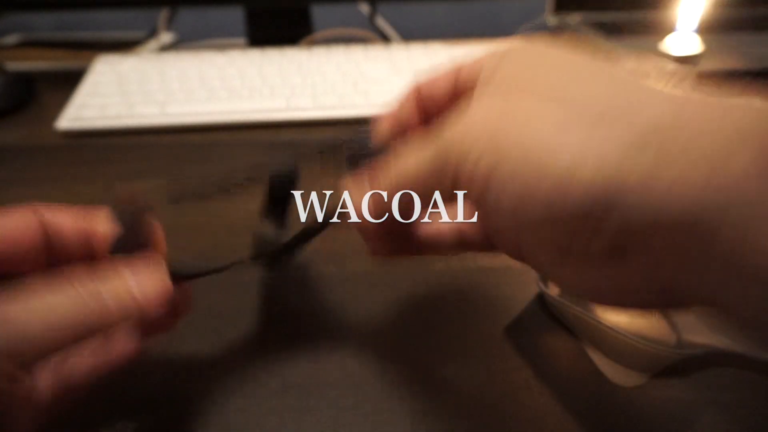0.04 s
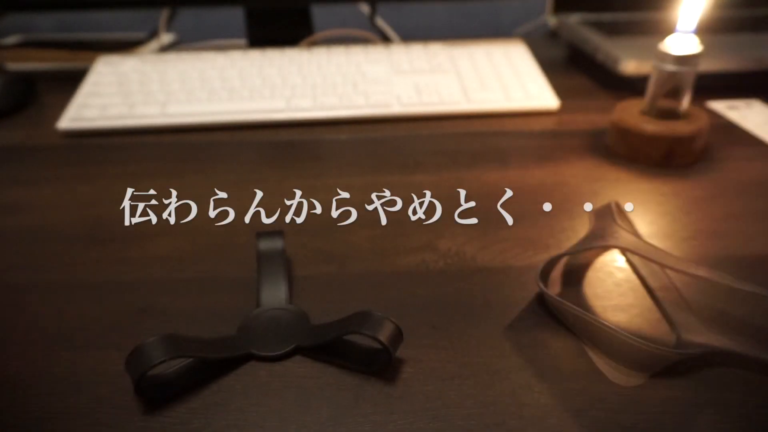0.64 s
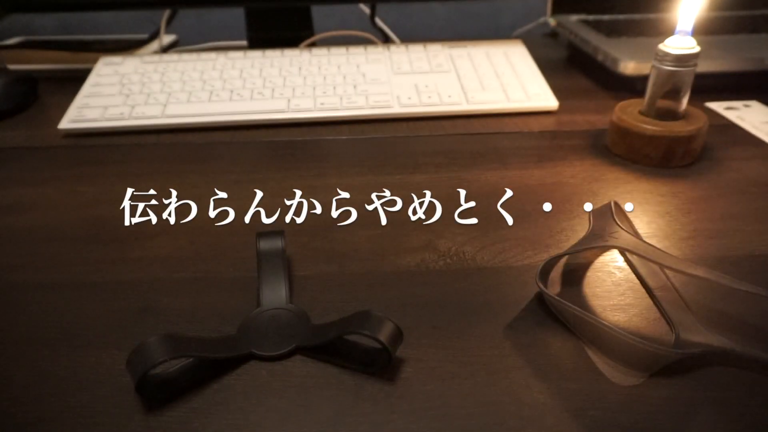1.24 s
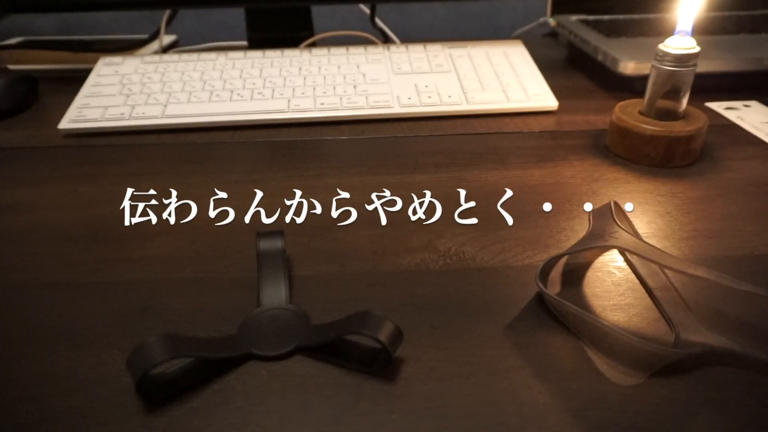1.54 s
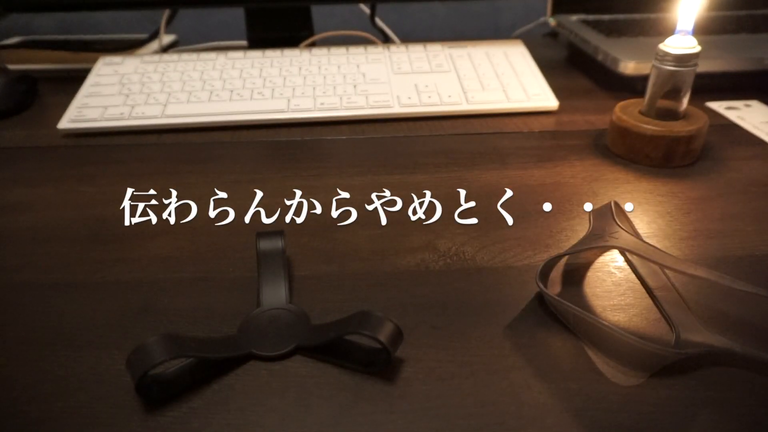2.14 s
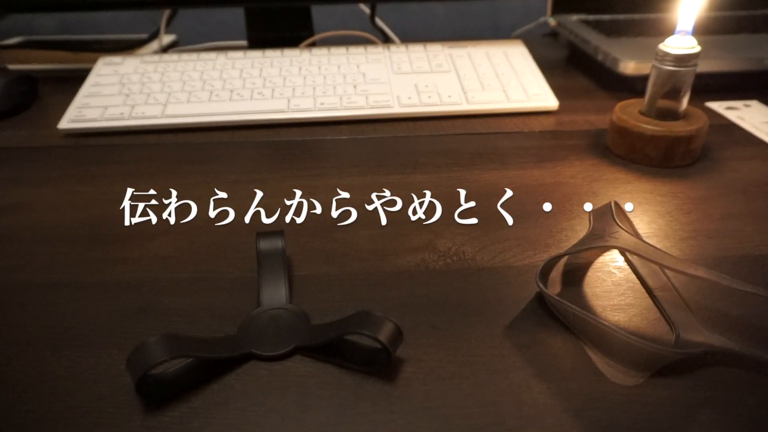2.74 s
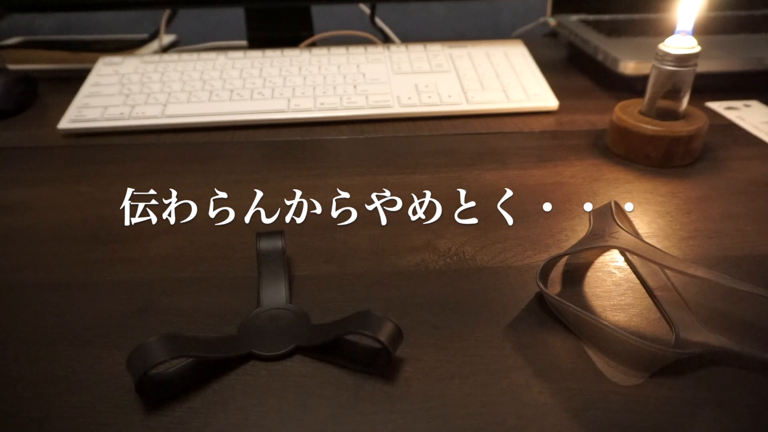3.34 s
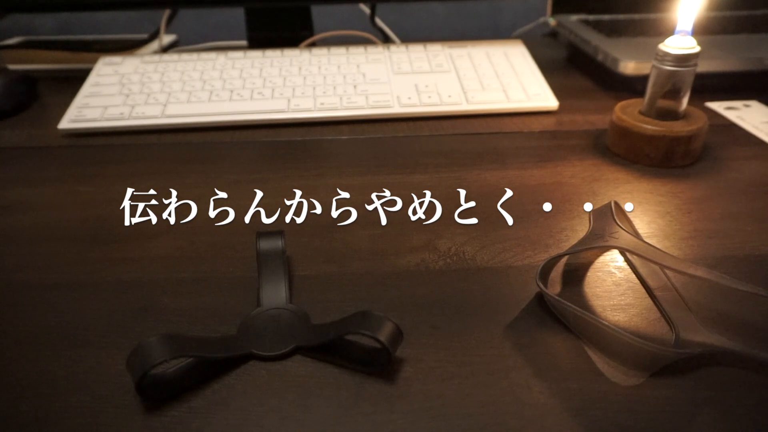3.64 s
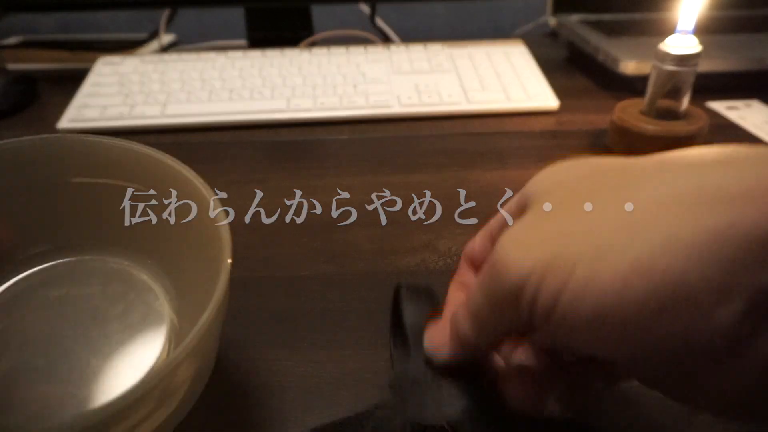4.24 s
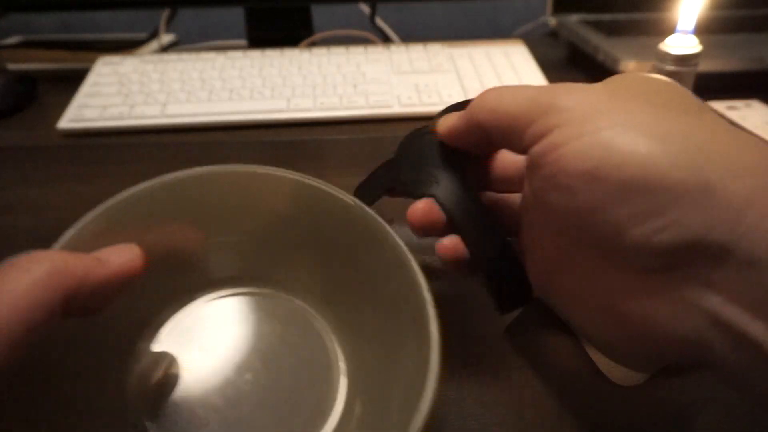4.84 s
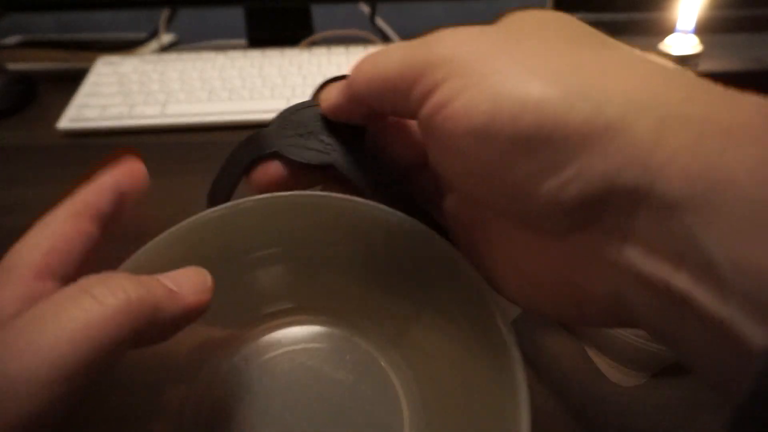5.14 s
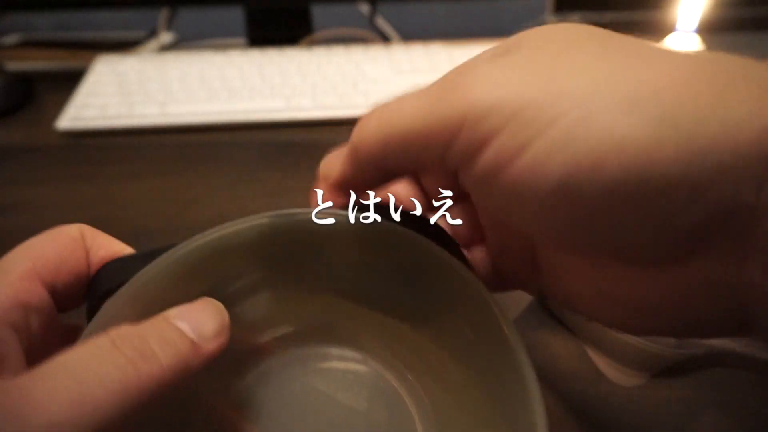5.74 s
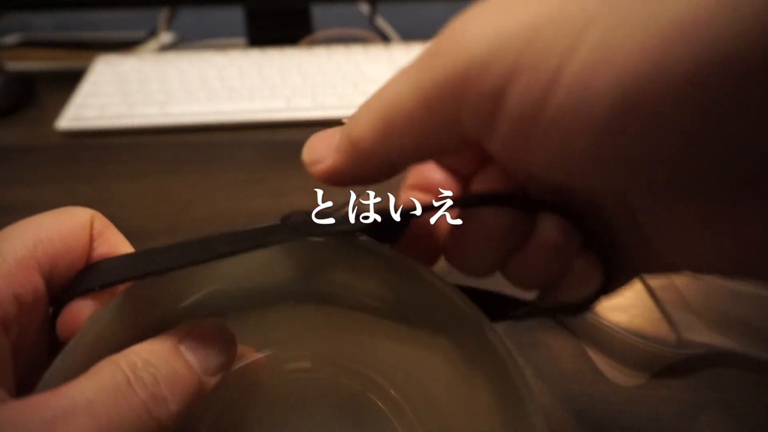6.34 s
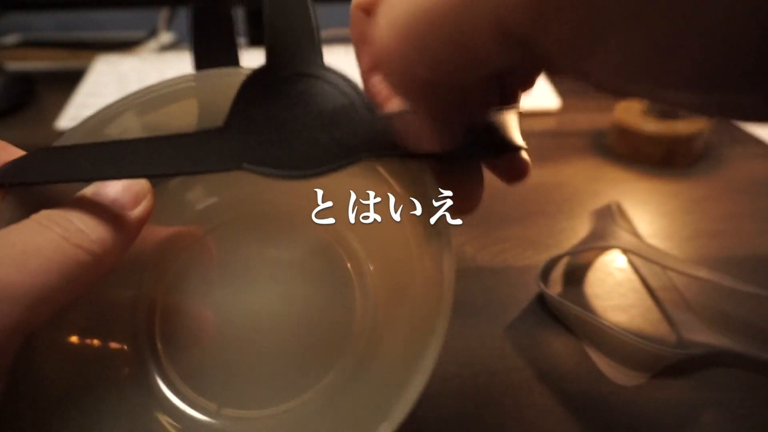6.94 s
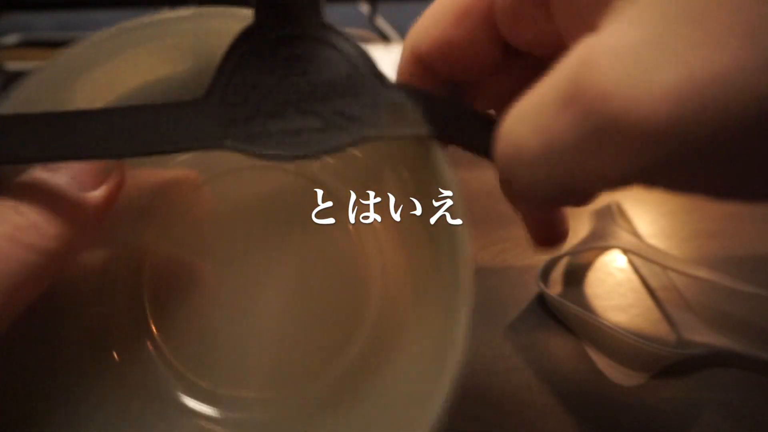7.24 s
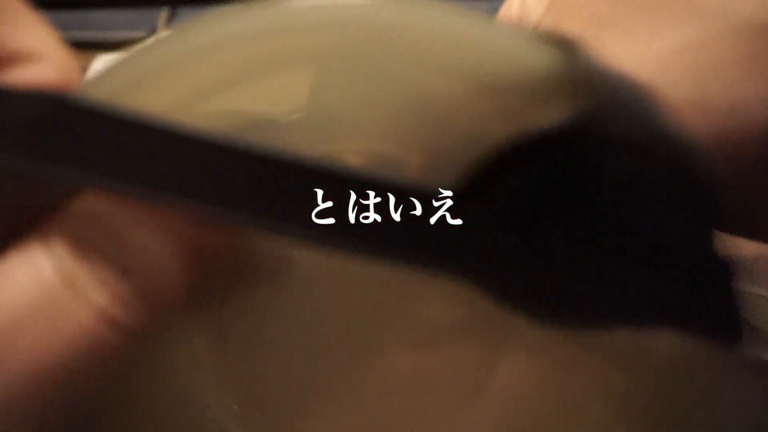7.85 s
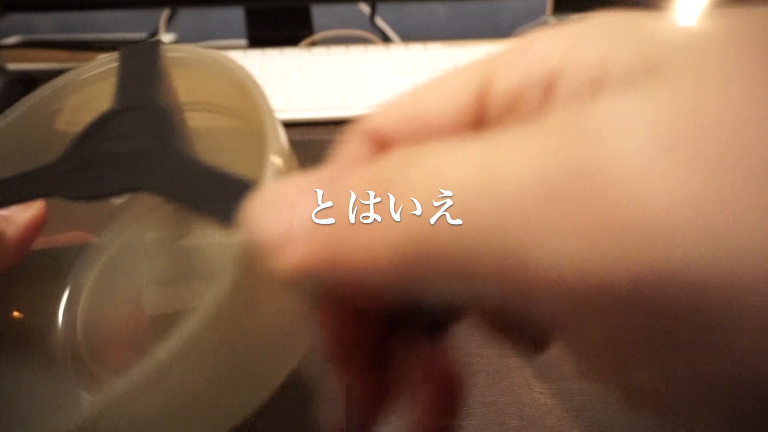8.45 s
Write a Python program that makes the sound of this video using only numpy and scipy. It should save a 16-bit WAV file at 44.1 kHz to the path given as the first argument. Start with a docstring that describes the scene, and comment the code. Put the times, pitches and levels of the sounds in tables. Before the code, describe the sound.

A strap taps on a wooden desk, then a plastic bowl knocks and scrapes as a silicone band rubs and snaps on its rim.

```python
"""An elastic strap drops on a wooden desk; fingers tap, a forearm drags, sleeves rustle.
From 2.8 s a plastic bowl is fetched from the side, clacking and grazing on its neighbours.
It is set down at 4.9 s, scrapes over the desk and knocks twice. From 6.2 s a silicone band
is stretched round it, rubbing, slipping and snapping on the rim.
Close stereo microphone in a small quiet room."""
import sys
import numpy as np
from scipy import signal
from scipy.fft import rfft, irfft
from scipy.io import wavfile
from scipy.ndimage import uniform_filter1d

SR = 44100
rng = np.random.default_rng(int(sys.argv[2]) if len(sys.argv) > 2 else 0)


def digitize_waveform(pressure):
    """Quantize a signal to 16-bit integers and store it at the path in sys.argv[1].

    Rows of a 2-D input are taken as channels; values are limited to [-1, 1].
    """
    field = np.atleast_2d(pressure).T
    bounded = np.clip(field, -1, 1)
    quanta = np.round(bounded * 32767).astype(np.int16)
    wavfile.write(sys.argv[1], SR, quanta)


N = 378819
TIME_S = np.arange(N) / SR
TOP_HZ, JUDDER_PER_S = 15900, 45
PUSH_RISE_S, STROKE_RISE_S, RUB_FALL_S = 0.087, 0.075, 0.16  # per 60 dB


def bowl_knocks():
    """The bowl's base knocks on the desk."""
    # start_s, level_db, bass_rel_db, treble_rel_db, chatter_s
    hits = [(4.8745, -34, -8.5, -16, 0.015), (4.889, -38, -3, -19, 0.017), (4.899, -37.5, -6.5, -16, 0.022),
            (5.244, -62.5, -4.5, -18, 0.0011), (6.022, -55, 4, -22, 0.016), (6.149, -37, 0, -18, 0.007),
            (6.163, -42.5, -1, -18, 0.023), (6.416, -46, -6, -26, 0.008), (6.4265, -29, -13, -25, 0.0047),
            (6.4485, -38.5, -9, -21, 0.012)]
    # desk under the bowl: pitch_hz, level_db, t60_s
    modes = [(135, -14, .06), (168, -6, .07), (215, -3, .09), (279, -6, .05), (372, -5, .025),
             (462, -2, .028), (530, -2, .026), (692, -1, .03), (790, 2, .03), (870, -2, .028),
             (1060, -6, .025), (1256, -4, .028), (1550, -9, .022), (2000, -12, .02)]
    return blows(hits, modes, crack_db=23, dense_db=7, tick=0.71, ping=0.092, ping_hz=2700,
                 lowest_hz=120, split_hz=613, dull_hz=5050, pan_db=-1.5, lag_ms=0.071,
                 trim_db=(2.5, -5, 2))


def desk_thuds():
    """The weight of hand or bowl bends the desk top, which swings briefly."""
    # start_s, level_db, pitch_hz, t60_s
    hits = [(0.131, -50.5, 169.5, 0.14), (0.226, -50, 205, 0.16), (2.737, -59, 237, 0.1),
            (3.07, -60, 217, 0.28), (4.877, -28.5, 212, 0.14), (6.022, -46, 257, 0.11),
            (6.15, -21, 198, 0.11), (6.287, -44, 300, 0.1), (6.424, -27, 212.6, 0.2)]
    out, rise_s = 0, 0.0025
    for start_s, level_db, pitch_hz, t60_s in hits:
        t = np.maximum(TIME_S - start_s, 0)
        fade = undb(level_db - 60 * np.minimum(t / t60_s, 2)) * (1 - np.exp(-t / rise_s))
        out = out + fade * np.sin(2 * np.pi * pitch_hz * t)
    return place(out)


def bowl_slide():
    """The bowl's foot sticks and slips on the wood; hand-damped, bowl and desk rumble broadly."""
    # start_s, length_s, level_db, drift_db
    pushes = [(4.995, 0.12, -46, 0), (5.24, 0.41, -70.5, 1.5), (5.685, 0.19, -50, -3.5),
              (5.9, 0.4, -59, -2), (6.43, 0.049, -39.5, -10.5)]
    # freq_hz, level_db
    spectrum = [(40, -26), (90, -16), (145, -11.5), (210, 1), (260, -7), (335, -17), (430, -14.5),
                (530, -10.5), (730, -21), (1150, -21.5), (1500, -31.5), (2900, -40.5), (6000, -51),
                (15000, -57)]
    rumble = colour(grains(N, per_s=2800, spread_db=0), spectrum)
    rumble = rumble / np.sqrt(uniform_filter1d(rumble ** 2, SR // 20) + 1e-12)  # steady push
    judder_db = 1.3 * walk(JUDDER_PER_S)
    return place(rumble * undb(judder_db) * swell(pushes, PUSH_RISE_S, RUB_FALL_S), pan_db=-0.41)


def rim_snaps():
    """Band and fingertips snap on the rim of the held bowl."""
    # start_s, level_db, bass_rel_db, treble_rel_db, chatter_s
    hits = [(6.2325, -45, -8, -11.5, 0.00058), (6.284, -38, -13, -3, 0.0022), (6.4, -56, -12, -10, 0.0008),
            (6.546, -42.5, -7, -6, 0.006), (6.593, -55, -14, -1.5, 0.0016),
            (6.701, -52.5, -18, -7.5, 0.022), (6.757, -47, -5, -19, 0.0018), (6.83, -67, -2, -15, 0.0049),
            (6.851, -52.5, -11, -23, 0.00053), (7.019, -42, -9.5, -5, 0.0034), (7.137, -64, -8, 10, 0.0013),
            (7.187, -62, -12, 2.5, 0.0012), (7.59, -56, -7, -3.5, 0.0047),
            (7.7832, -37, -17.5, -0.5, 0.0039), (7.801, -43, -7, 2, 0.0055), (7.809, -40, -18, -20, 0.0033),
            (7.8255, -46.5, -15, -3, 0.0032), (7.8505, -49.5, -9, -1.5, 0.0034),
            (7.9325, -53, -14, -13, 0.0022), (7.9372, -36, -20, -9, 0.002),
            (8.047, -53.5, -6.5, -10, 0.00063), (8.084, -41.5, -13, -8, 0.016),
            (8.096, -43.5, -12.5, -1, 0.0021), (8.121, -40.5, -15, -26, 0.00081),
            (8.157, -58, 1, -8, 0.0067), (8.2215, -48, -7, -6, 0.005), (8.578, -58, -9, -9.5, 0.005)]
    # held bowl: pitch_hz, level_db, t60_s
    modes = [(300, -9, .03), (470, -8, .025), (690, 0, .023), (785, 2, .022), (860, 1, .02),
             (1100, -7, .014), (1280, -2, .02), (1920, -9, .014), (2110, -10, .014), (2920, -5, .007),
             (3450, 1, .007), (4290, -3, .006), (4890, -4, .006), (6000, -1, .005)]
    return blows(hits, modes, crack_db=26.5, dense_db=-4, tick=0.56, ping=0.29, ping_hz=3560,
                 lowest_hz=94, split_hz=360, dull_hz=4340, pan_db=0.2, lag_ms=-0.032,
                 trim_db=(0.5, -2, -2))


def band_cracks():
    """The taut band lets go of the rim with a bright crack."""
    # start_s, level_db, centre_hz, width_octaves
    hits = [(6.2832, -46.5, 3480, 0.3), (6.2838, -49, 5500, 1.1), (7.022, -63, 11000, 0.49),
            (7.7838, -49, 7600, 1.8), (7.8015, -72, 9900, 1), (7.9322, -49, 7960, 1.5),
            (8.096, -65, 9800, 0.61), (8.2212, -61.5, 9500, 2.5)]
    return contacts(hits, pan_db=-5)


def band_strokes():
    """Silicone creeps over plastic: dense slips sound the bowl's hollow, with a dry hiss on top."""
    # start_s, length_s, level_db, drift_db, hiss_rel_db
    strokes = [(6.83, 0.12, -85.5, -1, 4), (6.979, 0.025, -65.5, 6.5, -4), (7.058, 0.42, -84, -5, 4),
               (7.782, 0.0047, -70, 17.5, -2), (8.09, 0.11, -55.5, -8.5, -13), (8.325, 0.01, -68, -10, -11),
               (8.374, 0.042, -61, -2, -15.5)]
    # both spectra: freq_hz, level_db
    hollow_spectrum = [(60, -30), (220, -7), (370, -8.5), (520, -7), (800, 0.5), (990, -15), (1300, -15.5),
                       (2100, -26), (6000, -51), (15000, -59)]
    hiss_spectrum = [(800, -25), (2200, -14), (3000, -6), (3750, -4), (5000, -8.5), (8000, -12),
                     (15000, -14)]
    slips = grains(N, per_s=4000, spread_db=2)
    hollow, hiss = unit(colour(slips, hollow_spectrum)), unit(colour(slips, hiss_spectrum))
    out = 0
    for *move, hiss_rel_db in strokes:
        out = out + (hollow + hiss * undb(hiss_rel_db)) * swell([move], STROKE_RISE_S, RUB_FALL_S)
    return place(out * undb(8))


def bowl_clacks():
    """The bowl clacks on its neighbours as it is picked up, off to one side."""
    # start_s, level_db, bass_rel_db, treble_rel_db, chatter_s
    hits = [(2.843, -64, -22, -6, 0.0057), (2.858, -45.5, -7.5, -9, 0.004), (3.735, -69, 0, 2, 0.002),
            (3.789, -64.5, -9, 9.5, 0.0059), (3.879, -54, -16, -10, 0.038), (3.894, -42, -30, 0, 0.024),
            (3.914, -56.5, -3.5, 11, 0.002)]
    # free bowl: pitch_hz, level_db, t60_s
    modes = [(682, 11, 0.024), (732, 2, 0.1), (816, -4, 0.07), (1017, 4.5, 0.06), (1206, 1.5, 0.06),
             (1287, -3.5, 0.11), (1520, 0, .03), (2390, 1, 0.03), (2480, -6, 0.04), (3290, -9, 0.08),
             (4830, -10, 0.08)]
    return blows(hits, modes, crack_db=33, dense_db=-4, tick=0.093, ping=0.41, ping_hz=3070,
                 lowest_hz=108, split_hz=685, dull_hz=5500, pan_db=-4.5, lag_ms=0.17,
                 trim_db=(2.5, 2, -0.5))


def desk_taps():
    """Strap and fingers land on the desk."""
    # start_s, level_db, bass_rel_db, treble_rel_db, chatter_s
    hits = [(0.165, -62.5, -2.5, -8.5, 0.024), (0.226, -63, 2, -9, 0.03), (0.236, -59, -7.5, -6, 0.098),
            (0.361, -63.5, -7, -4, 0.0013), (1.592, -61, -13, -13, 0.019), (1.685, -69, -22, 14.5, 0.024),
            (1.722, -58, -7.5, -14, 0.025), (1.79, -50.5, -12, -4, 0.026), (1.806, -51.5, -12, -5, 0.018),
            (1.922, -64, 3.5, -21, 0.021), (3.05, -57.5, -7, -12, 0.012), (3.402, -66, -1.5, 0.5, 0.016),
            (4.196, -62.5, -7.5, -9.5, 0.02), (4.21, -59.5, -13, -9.5, 0.06),
            (4.245, -53.5, -13, -12, 0.05), (4.325, -62.5, -3.5, -8.5, 0.007),
            (4.437, -55.5, -27, -12.5, 0.037), (4.464, -51, -20, -18, 0.042),
            (4.51, -63.5, -12, -12, 0.024)]
    # desk top: pitch_hz, level_db, t60_s
    modes = [(123, -4, 0.04), (178, -3, 0.086), (212, -1.5, 0.13), (296, -3.5, 0.052), (416, -46, 0.019),
             (576, -6, 0.056), (873, 11, 0.026), (1290, 3, 0.082), (1720, -3, 0.023), (2180, -6, 0.018),
             (2940, 9.5, 0.019)]
    return blows(hits, modes, crack_db=44.5, dense_db=4, tick=0.55, ping=0.66, ping_hz=3900,
                 lowest_hz=109, split_hz=710, dull_hz=4640, pan_db=-1.5, lag_ms=0.031,
                 trim_db=(5, 0.5, 2))


def strap_ticks():
    """The strap's hard edges tick on the wood."""
    # start_s, level_db, centre_hz, width_octaves
    hits = [(0.1652, -69.5, 3200, 1.3), (0.2468, -65, 3440, 0.56), (0.255, -80, 3400, 0.99),
            (0.2875, -77, 3100, 0.74), (0.361, -83, 3080, 1), (4.438, -65, 3180, 0.52),
            (4.4655, -62, 2880, 1.1), (4.5115, -64.5, 3200, 1.1)]
    return contacts(hits, pan_db=-9)


def forearm_drag():
    """Skin drags on the desk; the wood rumbles, lower under the arm than under the fingers."""
    # start_s, length_s, level_db, drift_db, centre_hz
    leans = [(0.25, 0.087, -67, -9, 260), (1.25, 0.01, -68, -11, 139), (1.415, 0.015, -63.5, -9, 375),
             (1.47, 0.025, -69, -7, 300), (1.715, 0.1, -62, 0, 296), (1.745, 0.032, -54, -1, 115),
             (1.84, 0.097, -53.5, 3, 290), (2.738, 0.016, -63.5, -4.5, 330), (2.9, 0.043, -63.5, -3.5, 150)]
    slips = grains(N, per_s=3000, spread_db=1)
    dull_slips = band(slips, 300, "lowpass", order=1)
    rumble = unit(band(dull_slips, [45, 900], "bandpass")) * undb(-1)
    out = 0
    for *move, centre_hz in leans:
        wood = unit(band(slips, edges_hz(centre_hz, octaves=0.73), "bandpass"))
        out = out + unit(wood + rumble) * swell([move], PUSH_RISE_S, RUB_FALL_S)
    flutter_db = 2 * walk(JUDDER_PER_S)
    return place(out * undb(flutter_db))


def bowl_graze():
    """The bowl's wall slips lightly over its plastic neighbours as it is drawn out."""
    # start_s, length_s, level_db, drift_db
    grazes = [(3.1, 0.34, -72, 1.2), (3.5, 0.18, -72.5, 1.5), (3.73, 0.26, -70.5, 0.28)]
    # freq_hz, level_db
    spectrum = [(150, -12), (500, -6), (700, 3), (850, -3), (1100, -2), (1300, 3), (1700, -5), (2100, -4),
                (2400, -2), (2900, -7), (5000, -8), (9000, -12), (15000, -19)]
    slips = unit(colour(grains(N, per_s=2700, spread_db=4), spectrum))
    return place(slips * swell(grazes, STROKE_RISE_S, RUB_FALL_S), pan_db=-1.6, lag_ms=0.2)


def sleeves():
    """Cloth fibres brush past each other off to the side, so the sound arrives diffuse."""
    # start_s, length_s, level_db, drift_db
    reaches = [(0.96, 0.54, -70.5, 6.3), (1.71, 0.17, -59.5, 2), (2.05, 0.35, -78, 11.2),
               (2.5, 0.57, -76, 2.1)]
    # freq_hz, level_db
    spectrum = [(100, -4), (300, 5), (600, 1), (1300, 2), (3000, 0), (6000, -2), (9000, -2), (12000, -6),
                (16000, -10)]
    fibres = np.array([grains(N, per_s=14000, spread_db=-2.5) for _ in range(2)])
    shared_bass = band(grains(N, per_s=14000, spread_db=3.5), 300, "lowpass", order=1)
    rustle = unit(colour(band(fibres, 440, "highpass", order=1) + shared_bass, spectrum))
    return rustle * swell(reaches, rise_s=0.62, fall_s=0.7) * undb(2.5)


def air():
    """Steady hush of room and microphones."""
    # freq_hz, level_db
    spectrum = [(25, -18), (60, -8), (140, 0), (350, -.5), (520, -4), (1000, -6), (1300, -3), (1650, -9),
                (3000, -11), (6000, -14.5), (10000, -16), (14500, -17.5), (16000, -23)]
    return unit(colour(two_ears(N, shared_hz=595), spectrum)) * undb(-70.4)


def room(dry, wet_db):
    """Add reflections off desk, screen and near walls, dying band by band."""
    # freq_hz, t60_s
    decays = [(150, 0.44), (400, 0.25), (1000, 0.22), (3000, 0.28), (8000, 0.29), (15000, 0.32)]
    bands_hz, t60s_s = np.transpose(decays)
    t = np.arange(SR // 2) / SR
    hz = np.fft.rfftfreq(len(t), 1 / SR)
    # up close, direct bass outweighs the room
    noise = rfft(band(two_ears(len(t), shared_hz=800), 400, "highpass", order=1))
    tail = 0
    for t60_s, share in zip(t60s_s, np.eye(len(decays))):
        weight = along(np.c_[bands_hz, share], hz)
        tail = tail + irfft(noise * weight, len(t)) * undb(-60 * t / t60_s)
    tail = tail * np.clip((t - 0.001) / 0.00077, 0, 1)
    tail = tail / np.sqrt(np.sum(tail ** 2) / 2)
    return dry + undb(wet_db) * signal.fftconvolve(dry, tail, axes=1)[:, :N]


def blows(hits, modes, crack_db, dense_db, tick, ping, ping_hz, lowest_hz, split_hz, dull_hz,
          pan_db, lag_ms, trim_db):
    """A first contact, then dying chatter, rings a body; trim_db offsets (bass, middle, treble)."""
    out, t, attack = np.zeros((2, N + SR)), np.arange(2 ** 14) / SR, SR // 50
    for start_s, level_db, bass_rel_db, treble_rel_db, chatter_s in hits:
        force = unpitched(grains(len(t), per_s=9000, spread_db=2.5), np.exp(-t / chatter_s))
        force = force / np.sqrt(np.sum(force ** 2) + 1e-12)
        force[0] += tick
        ring = signal.fftconvolve(force, body(modes, crack_db, dense_db))[:len(t)]
        low = band(band(ring, 506, "lowpass", order=4), lowest_hz, "highpass", order=4)
        middle = band(ring, [split_hz, 2500], "bandpass", order=4)
        high = band(ring, 1736, "highpass", order=3)
        # the contact pings high on treble-heavy hits, otherwise near 2.7 kHz
        patch_hz = np.clip(ping_hz * 4 ** treble_rel_db, 2720, TOP_HZ / 2)
        patch = band(high, [0.85 * patch_hz, 1.15 * patch_hz], "bandpass", order=1)
        high = band(high, dull_hz, "lowpass", order=1) + ping * patch
        gains = undb(level_db + np.array([bass_rel_db, 0, treble_rel_db]) + trim_db)
        blow = sum(part * gain / np.std(part[:attack]) for part, gain in zip((low, middle, high), gains))
        start = int(start_s * SR)
        out[:, start:start + len(t)] += place(blow, pan_db, lag_ms)
    return out[:, :N]


def body(modes, crack_db, dense_db):
    """Impulse response: a crack, main modes varied by each grip, and a crowd of short-lived ones."""
    t = np.arange(2 ** 13) / SR
    pitch_hz, level_db, t60_s = np.transpose(modes)[:, :, None]
    detune, scatter_db, phase = rng.standard_normal((3, len(modes), 1))
    fade = undb(level_db + scatter_db - 60 * t / t60_s)
    ring = np.sum(fade * np.cos(2 * np.pi * (pitch_hz * (1 + 0.025 * detune) * t + phase)), axis=0)
    crowd_fade = undb(-60 * t / np.mean(t60_s))
    crowd = unit(band(unpitched(rng.standard_normal(len(t)), crowd_fade), 480, "lowpass", order=1))
    ring = ring + crowd * np.sqrt(np.mean(crowd_fade ** 2)) * undb(dense_db)
    ring[0] += undb(crack_db)
    return ring


def contacts(hits, pan_db):
    """A sharp contact strikes once and rings for about a millisecond."""
    out, t = np.zeros(N + SR), np.arange(2 ** 10) / SR
    chatter, decay_s = 0.6, 0.0007
    for start_s, level_db, centre_hz, width_octaves in hits:
        force = chatter * rng.standard_normal(len(t)) * np.exp(-t / decay_s)
        force[0] += 1
        click = band(force, edges_hz(centre_hz, width_octaves), "bandpass", order=4)
        start = int(start_s * SR)
        out[start:start + len(t)] += unit(click) * undb(level_db)
    return place(out[:N], pan_db)


def swell(moves, rise_s, fall_s):
    """Gain of hand movements: rise, hold with drifting pressure, fall (times per 60 dB)."""
    gain = 0
    for start_s, length_s, level_db, drift_db in moves:
        t = TIME_S - start_s
        away = np.maximum(-t, 0) / rise_s + np.maximum(t - length_s, 0) / fall_s
        gain = gain + undb(level_db + drift_db * np.clip(t / length_s, 0, 1) - 60 * away)
    return gain


def grains(size, per_s, spread_db):
    """Tiny slips at random moments; positive spread_db makes a few much larger."""
    size_draw, time_draw = rng.random((size, 2)).T
    strength = undb(spread_db * np.minimum(-np.log(size_draw), 4))
    return unit(rng.standard_normal(size) * strength * (time_draw < per_s / SR))


def unpitched(noise, fade):
    """Dying noise, its spectrum flattened so that it has no pitch."""
    x = noise * fade
    for _ in range(5):
        x = irfft(np.exp(1j * np.angle(rfft(x))), len(x))
        x = x * fade / np.sqrt(np.abs(uniform_filter1d(x ** 2, size=96)) + 1e-20)
    return x


def walk(per_s):
    """Random levels, held briefly and smoothed."""
    hold = int(SR / per_s)
    return unit(uniform_filter1d(rng.standard_normal(N)[np.arange(N) // hold], hold))


def place(x, pan_db=0, lag_ms=0):
    """Two microphones: level and delay of the left relative to the right."""
    hz = np.fft.rfftfreq(2 * len(x), 1 / SR)
    delay = np.exp(-2j * np.pi * hz * lag_ms / 1000)
    left = irfft(rfft(x, 2 * len(x)) * delay)[:len(x)]
    return np.array([left * undb(pan_db / 2), x * undb(-pan_db / 2)])


def two_ears(size, shared_hz):
    """Two noises, alike in the bass, unrelated in the treble."""
    mid, side = rng.standard_normal((2, size))
    side = band(side, shared_hz, "highpass", order=1)
    return np.array([mid + side, mid - side]) / np.sqrt(2)


def colour(x, spectrum):
    """Filter by (freq_hz, level_db) points."""
    hz = np.fft.rfftfreq(x.shape[-1], 1 / SR)
    return irfft(rfft(x) * undb(along(spectrum, hz)), x.shape[-1])


def along(points, hz):
    """Interpolate (freq_hz, value) points over log frequency."""
    freq_hz, value = np.transpose(points)
    return np.interp(np.log(hz + 1), np.log(freq_hz), value)


def band(x, hz, kind, order=2):
    """Butterworth filter."""
    sos = signal.butter(order, np.minimum(hz, SR / 2 - 1), kind, fs=SR, output="sos")
    return signal.sosfilt(sos, x)


def edges_hz(centre_hz, octaves):
    """Lower and upper band edge."""
    return centre_hz * 2 ** (np.array([-0.5, 0.5]) * octaves)


def undb(db):
    """Decibels to gain."""
    return 10 ** (np.asarray(db) / 20)


def unit(x):
    """Scale to unit rms."""
    return x / np.sqrt(np.mean(x ** 2) + 1e-20)


def scene():
    """Bowl and band up close are mostly direct; taps and side sounds are mostly room."""
    taps, clacks, knocks, snaps = desk_taps(), bowl_clacks(), bowl_knocks(), rim_snaps()
    mix = room(knocks + bowl_slide() + desk_thuds(), wet_db=-1)
    mix += room(snaps + band_strokes() + band_cracks(), wet_db=-3)
    desk = taps + forearm_drag()
    mix += room(strap_ticks(), wet_db=-2)
    mix += room(desk, wet_db=2.5)
    mix += room(clacks + bowl_graze(), wet_db=3)
    return mix + sleeves() + air()


def record(dry):
    """Steep low-pass at TOP_HZ."""
    return signal.sosfilt(signal.ellip(8, 0.2, 70, TOP_HZ, fs=SR, output="sos"), dry)


dry = scene()
out = record(dry)
digitize_waveform(out)
```